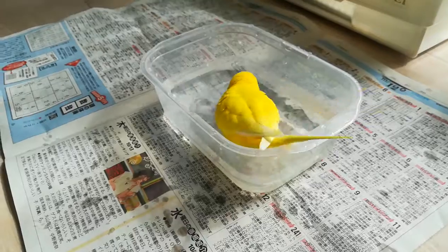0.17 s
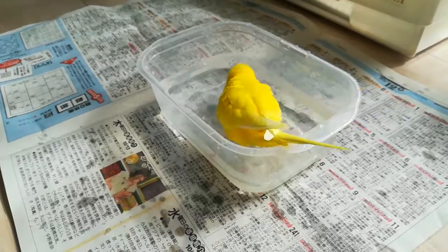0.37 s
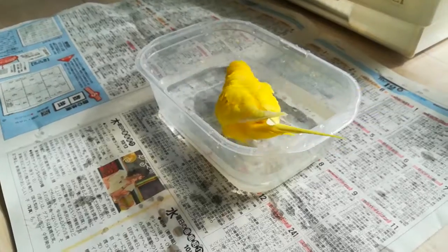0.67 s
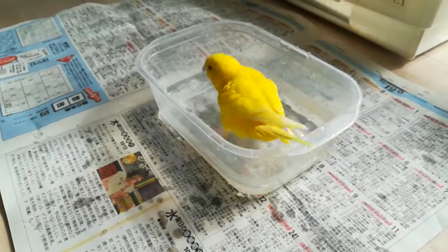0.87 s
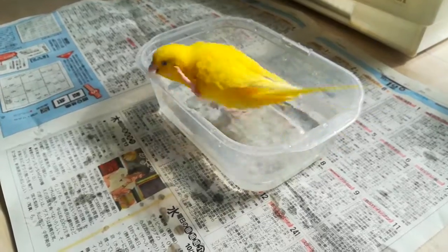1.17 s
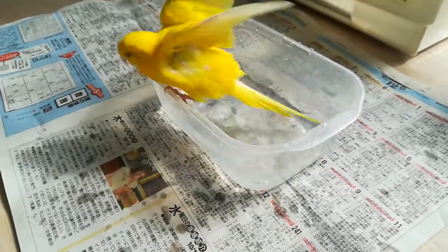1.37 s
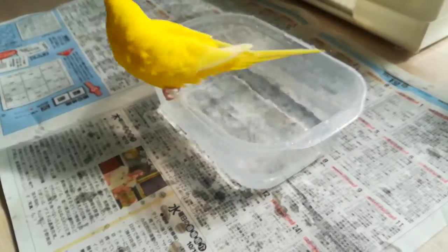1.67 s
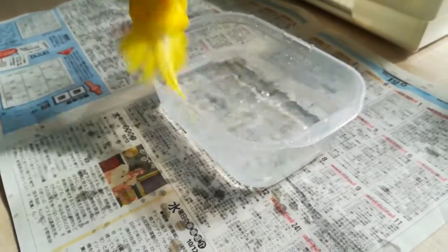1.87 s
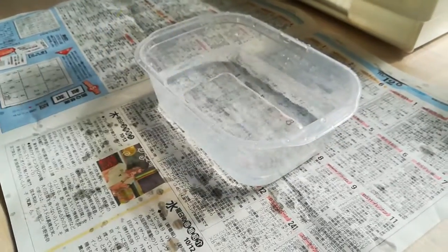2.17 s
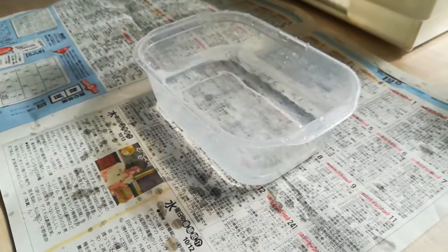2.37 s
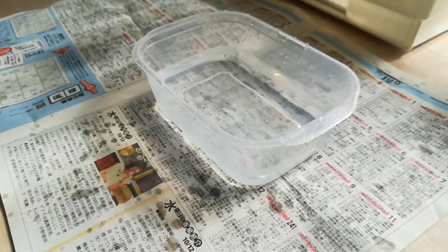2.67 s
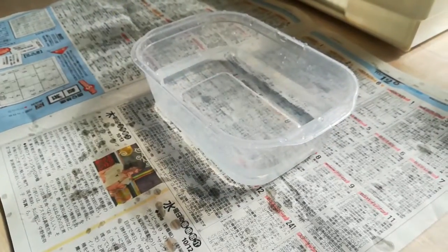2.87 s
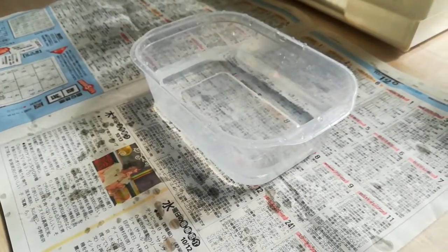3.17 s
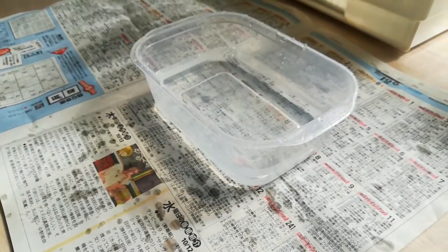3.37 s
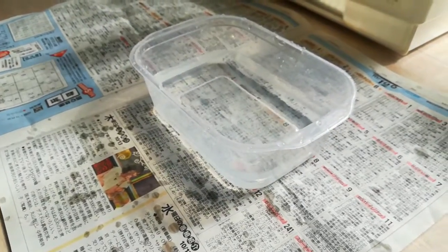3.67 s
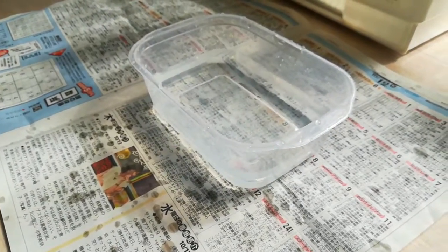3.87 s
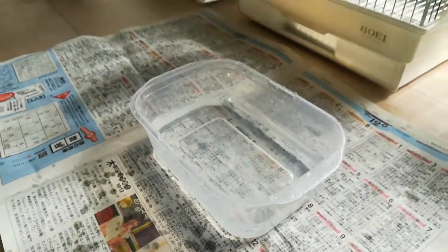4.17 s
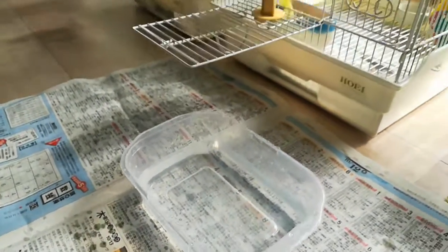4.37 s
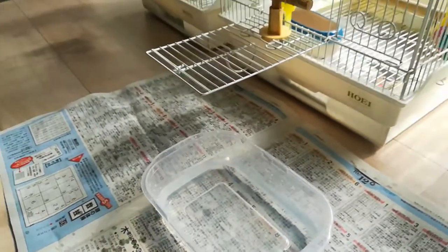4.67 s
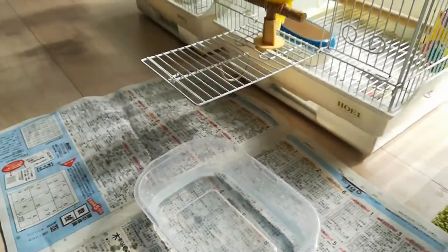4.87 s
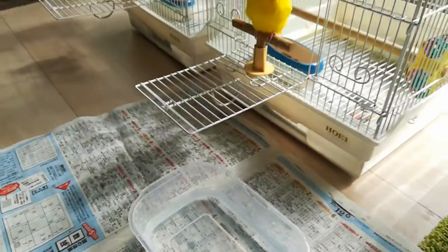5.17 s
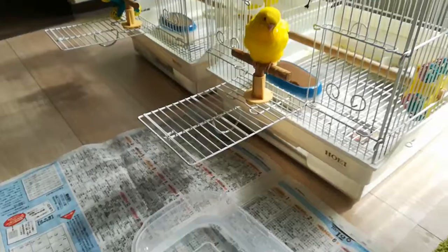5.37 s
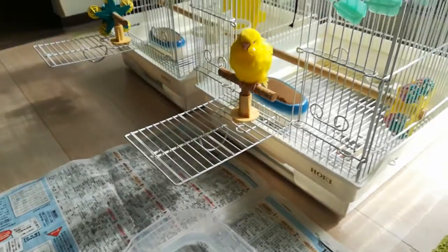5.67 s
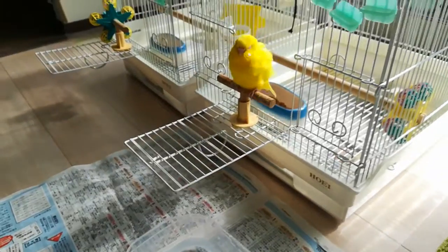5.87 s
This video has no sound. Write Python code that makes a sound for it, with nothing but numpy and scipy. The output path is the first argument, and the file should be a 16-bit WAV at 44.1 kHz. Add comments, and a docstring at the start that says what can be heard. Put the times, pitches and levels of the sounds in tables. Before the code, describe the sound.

A small bird leaves its plastic bath with knocks, drips and wing puffs, shakes its feathers in a cage, chirps, scratches and settles.

```python
"""A pop as the microphone opens, then wet claws and drops ticking on a shallow plastic tub in a small room.
A budgie leaves its bath there: wing beats push air on the microphone as it takes off for its wire cage.
It shakes its feathers until the wires ring, chirps once, scratches itself and shuffles on the perch.
Filtered noise makes feathers, knocks and air; gliding harmonics make the voice; dying sines ring tub and metal.
Echoes and a decaying tail place the bird in the room, over quiet air and a wavering hum."""
import sys
import numpy as np
from scipy import signal
from scipy.fft import rfft, irfft, next_fast_len
from scipy.io import wavfile

SR = 44100
rng = np.random.default_rng(int(sys.argv[2]) if len(sys.argv) > 2 else 0)


def store_wav(level_fs):
    """Save 16-bit WAV to argv[1]."""
    pcm = np.round(np.clip(np.atleast_2d(level_fs), -1, 1) * 32767)
    wavfile.write(sys.argv[1], SR, pcm.T.astype(np.int16))


N = 264952
TIME = np.arange(N) / SR
POP_S, LANDING_S = 0.2535, 2.06  # the microphone opens; the bird lands on the cage
EDGE_HZ = 16100  # upper limit of the microphone's band


def amp(db):
    """Turns decibels into gain."""
    return 10 ** (np.asarray(db) / 20)


def unit(x):
    """Scales to rms 1."""
    return x / np.sqrt(np.mean(x ** 2) + 1e-20)


def read(points, hz):
    """Reads a table on a log-frequency axis."""
    f, value = np.transpose(points)
    return np.interp(np.log(hz + 1), np.log(f + 1), value)


def colour(x, points):
    """Filters x with the spectrum of a table, then scales to rms 1."""
    size = next_fast_len(x.shape[-1])
    gain = amp(read(points, np.fft.rfftfreq(size, 1 / SR)))
    return unit(irfft(rfft(x, size) * gain, size)[..., :x.shape[-1]])


def band(x, lo_hz, hi_hz):
    """Passes one band."""
    sos = signal.butter(2, [lo_hz, min(hi_hz, SR / 2 - 1)], "band", fs=SR, output="sos")
    return signal.sosfilt(sos, x)


def resonance(x, hz, width_hz):
    """Passes x through one resonance of peak gain 1."""
    return signal.lfilter(*signal.iirpeak(hz, hz / width_hz, SR), x)


def wander(size, hz):
    """Draws a random drift of rms 1, smooth above hz."""
    lowpass = 1 + (np.fft.rfftfreq(size, 1 / SR) / hz) ** 4
    return unit(irfft(rfft(rng.standard_normal(size)) / lowpass, size))


def add(mix, start_s, sound):
    """Mixes a sound in at its start time."""
    part = mix[..., max(round(start_s * SR), 0):][..., :sound.shape[-1]]
    part += sound[..., :part.shape[-1]]


def sides(left_db):
    """Gains of the two channels, the left louder than the right by left_db."""
    return amp([[left_db / 2], [-left_db / 2]])


def ring(modes, t):
    """Sums the dying sines of a struck body."""
    return sum(amp(db - 60 * t / t60_s) * np.sin(2 * np.pi * hz * t) for hz, db, t60_s in modes)


# The air that the feathers stir: pitch_hz [Hz], relative level_db [dB]
STIRRED_AIR = [(120, -9), (300, -4.5), (480, 1), (680, -5), (1100, 0.5), (1400, 0), (1680, 1), (1950, -4.5),
               (2400, -4.5), (3500, -11.5), (7000, -23.5)]
# The shake builds up, holds and dies away
SHAKE_START_S, SHAKE_RISE_S, SHAKE_EASE_S, SHAKE_END_S = 2.657, 0.12, 2.985, 3.332


def shake(air_db=-54, hiss_db=-43, throb_db=-56, beat_hz=27, depth=0.51,
          peak_s=2.888, hiss_width_s=0.14, throb_width_s=0.33):
    """The shaking body fans the air; its hardest part makes the feathers hiss and the cage throb."""
    times_s = [SHAKE_START_S, SHAKE_START_S + SHAKE_RISE_S, SHAKE_EASE_S, SHAKE_END_S]
    level = np.interp(TIME, times_s, [0, 1, 1, 0])
    uneven_hz = beat_hz * (1 + 0.11 * wander(N, 9.1))
    beat = 1 + depth * np.sin(2 * np.pi * np.cumsum(uneven_hz) / SR)
    fanned = level * amp(air_db) * beat * colour(rng.standard_normal((2, N)), STIRRED_AIR)

    hiss_swell = level * np.exp(-((TIME - peak_s) / hiss_width_s) ** 2)
    hiss = hiss_swell * amp(hiss_db) * beat * band(barbs(), 500, 14000)

    throb_swell = level * np.exp(-((TIME - peak_s) / throb_width_s) ** 2)
    throb = throb_swell * amp(throb_db) * unit(band(rng.standard_normal(N), 49.5, 78))
    return fanned, hiss, throb


# The feathers' hiss: pitch_hz [Hz], relative level_db [dB]
FEATHER_HISS = [(900, -29), (2700, -6.5), (3700, -3.5), (4400, -0.5), (6000, -4), (7900, -2.5), (9000, -7),
                (11300, -10), (13500, -15), (16000, -29)]


def barbs(grain_db=2.5, spread=1.0):
    """Feathers sliding over each other give a grainy hiss, partly alike on both sides."""
    grains = amp(grain_db * np.minimum(wander(N, 380), 2))
    shared = rng.standard_normal(N)
    return colour((shared + spread * rng.standard_normal((2, N))) * grains, FEATHER_HISS)


def flick(strokes, air_db, top_hz, rise_s=0.0026, fall_s=0.016):
    """Feather strokes (start_s, level_db, length_s) hiss and puff air: they start fast, sag and die."""
    lowpass = signal.butter(3, min(top_hz, EDGE_HZ), fs=SR, output="sos")
    hiss = signal.sosfilt(lowpass, barbs())
    level, t = np.zeros(N), TIME[:SR // 2]
    for start_s, db, length_s in strokes:
        fade = np.exp(-.5 * t / length_s - np.maximum(t - length_s, 0) / fall_s * 2)
        add(level, start_s, amp(db) * np.minimum(t / rise_s, 1) * fade)
    return level * (hiss + amp(air_db) * colour(rng.standard_normal((2, N)), STIRRED_AIR))


# Wing beats flick the wet feathers: start_s [s], relative level_db [dB]
WING_FLICKS = [(1.264, -58.5), (1.325, -56.5), (1.433, -61), (1.887, -45), (1.945, -50), (2.008, -57.5)]
# The sharpest jerks of the shake: start_s [s], relative level_db [dB]
SHAKE_JERKS = [(2.655, -57.5), (2.683, -47), (2.713, -41), (2.78, -36.5), (2.885, -35.5), (2.952, -41),
               (3.082, -38)]
# The bird settles and shifts on the cage:
# start_s [s], relative level_db [dB], length_s [s], top_hz of the hiss [Hz]
PERCH_SHUFFLES = [(2.085, -50.5, 0.053, 8650), (3.59, -64.5, 0.15, 7900), (5.136, -59, 0.058, 9000),
                  (5.202, -51.5, 0.075, 7160), (5.327, -52.5, 0.057, 6600), (5.461, -59, 0.054, 4560),
                  (5.602, -58, .09, 4530)]


def rustles(beat_s=0.041, jerk_s=0.03, scratch_db=-61, hollow_db=-3):
    """Wing beats and jerks are short and bright, shuffles soft and hollow; scratching leaves a faint hiss."""
    wings = flick([(s, db, beat_s) for s, db in WING_FLICKS], air_db=-1.5, top_hz=13700)
    jerks = flick([(s, db, jerk_s) for s, db in SHAKE_JERKS], air_db=-13.5, top_hz=15300)
    shuffles = sum(flick([(s, db, length_s)], air_db=-2.5, top_hz=top_hz, rise_s=0.0058)
                   for s, db, length_s, top_hz in PERCH_SHUFFLES)
    hollow = amp(hollow_db) * resonance(shuffles, 1700, 350)
    start_s, end_s = SCRATCH_BOUTS[0][0], SCRATCH_BOUTS[-1][1]
    raking = flick([(start_s, scratch_db, end_s - start_s)], air_db=-6, top_hz=11900, rise_s=0.043)
    return wings + jerks + shuffles + hollow + raking


# Resonances of the cage wires: pitch_hz [Hz], width_hz [Hz], relative level_db [dB]
CAGE_WIRES = [(1680, 40, -13), (3750, 60, -16), (4960, 120, -19), (6090, 30, -13), (7940, 90, -18),
              (11100, 200, -24), (12800, 25, -23), (14600, 100, -19), (15500, 100, -21)]


def wires(feathers, level_db=-60.5):
    """While the bird shakes, its feather noise drives the narrow resonances of the cage wires."""
    shaking = (TIME > SHAKE_START_S) & (TIME < SHAKE_END_S)
    driven = feathers * shaking
    ringing = sum(amp(db) * unit(resonance(driven, hz, width_hz)) for hz, width_hz, db in CAGE_WIRES)
    return amp(level_db) * ringing


# Syllables of the chirp: start_s [s], length_s [s], relative level_db [dB],
# first_hz [Hz], last_hz [Hz], rough [0-1], beak opening [0-1]
CHIRP_SYLLABLES = [(3.648, 0.041, -59, 1517, 2033, 0.4, .05), (3.69, 0.021, -43.5, 1639, 1707, 0.1, 0.3),
                   (3.712, 0.01, -42.5, 1827, 1885, 0.25, 0.57),
                   (3.725, 0.013, -38, 1830, 1700, 0.14, 0.76),
                   (3.741, 0.0172, -41, 1998, 2080, 0.21, 0.57), (3.754, .04, -40, 1329, 1046, 0.6, 0.62),
                   (3.795, .042, -38, 1057, 923, 0.18, 0), (3.841, 0.0064, -31.5, 901, 860, 0.07, 0.4),
                   (3.846, .018, -29, 831, 660, .5, 0.86)]


def chirp(level_db=-3):
    """The voice warbles upward, drops to a low buzz and ends in a harsh bark."""
    out = np.zeros(N)
    for start_s, length_s, db, *shape in CHIRP_SYLLABLES:
        add(out, start_s, amp(db + level_db) * syllable(length_s, *shape))
    return out


# The bird's throat: pitch_hz [Hz], relative shut_db with the beak nearly shut [dB], open_db [dB]
THROAT_COLOUR = [(720, -44, -58), (1030, -38, -4), (1330, 3, -10.5), (1540, 2.5, -8.5), (1960, -9, -24),
                 (2800, 21, -7), (3330, -12.5, -7), (3610, -8, 3.5), (4350, -29, -11.5), (5070, -41, 1.5),
                 (5770, -53, -7), (6700, -27.5, -26), (8400, -28, -11), (8740, -17, -31), (9700, -55, -55)]


def syllable(length_s, first_hz, last_hz, rough, beak, jitter=0.089, shimmer=0.4, rasp=0.83,
             rise_s=0.0037, fall_s=0.0057, sag_db=-1.5):
    """One glide of the syrinx; the throat picks out its harmonics."""
    t = np.arange(0, length_s + fall_s, 1 / SR)
    hz = np.interp(t, [0, length_s], [first_hz, last_hz])
    unsteady = 1 + jitter * rough * wander(SR // 4, 620)[:len(t)]
    turns = np.cumsum(hz * unsteady) / SR
    k = np.arange(1, 15)[:, None]  # harmonic numbers
    shut_db, open_db = (read([(row[0], row[side]) for row in THROAT_COLOUR], k * hz) for side in (1, 2))
    # the beak's opening moves the throat from its shut colour to its open one
    weights = amp(shut_db + beak ** 2 * (open_db - shut_db)) * (k * hz < EDGE_HZ)
    # in the harsh parts the harmonics slip out of step and smear into a rasp
    drift = np.array([wander(SR // 4, 335)[:len(t)] for _ in k])
    slip = rng.random(k.shape) + rasp * rough * drift / 2
    harmonics = weights * np.cos(2 * np.pi * (k * turns + slip))
    voice = harmonics.sum(0) / np.sqrt((weights ** 2).sum(0) / 2)
    envelope = np.minimum(t / rise_s, 1) * np.minimum((t[-1] - t) / fall_s, 1)
    flutter = 1 + shimmer * rough * wander(SR // 4, 300)[:len(t)]
    return envelope * amp(sag_db * t / length_s) * voice * flutter


# Thin, faint peeps: start_s [s], length_s [s], relative level_db [dB], pitch_hz [Hz]
FAINT_PEEPS = [(4.272, .08, -69, 4380), (4.385, 0.049, -61.5, 4350), (4.415, 0.062, -65, 4810),
               (4.591, .055, -68, 4400), (4.627, .042, -59.5, 4390), (5.615, .08, -70, 2230)]


def peeps(waver=0.0091):
    """Faint whistles swell and fade, each wavering about one pitch."""
    out = np.zeros(N)
    for start_s, length_s, db, hz in FAINT_PEEPS:
        t = np.arange(0, length_s, 1 / SR)
        turns = np.cumsum(hz * (1 + waver * wander(SR // 4, 250)[:len(t)])) / SR
        add(out, start_s, amp(db) * np.sin(np.pi * t / length_s) * np.sin(2 * np.pi * turns))
    return out


# Claws knock on the tub, later on the perch:
# start_s [s], relative level_db [dB], relative dull_db of the lower band [dB], left_db over right [dB]
CLAW_TAPS = [(1.189, -55.5, 3, 13.5), (1.1966, -49, -4, 0), (1.2366, -58.5, 0, -9), (1.2608, -45, -30, -1),
             (1.314, -47, -8, 5), (1.3332, -32.5, -8, 4.5), (1.514, -53, -21, -2), (1.527, -47, -9.5, 11),
             (1.8755, -43, -16, 7), (1.8994, -32.5, -5.5, 11), (1.9023, -37, -23, -14),
             (1.919, -41, -33, 1), (2.012, -45.5, -6.5, 8), (5.1848, -52, -28, -5), (5.207, -44, -28, 0),
             (5.2655, -52, -23, -8)]


def taps(level_db=2.5, dull_trim_db=-1):
    """Claws knock on plastic and wood, each a short crack from its own side."""
    out = np.zeros((2, N))
    for start_s, db, dull_db, left_db in CLAW_TAPS:
        knock = tap(db + level_db, dull_db + dull_trim_db, bright_db=-42, t60_s=.014, bright_hz=13300)
        add(out, start_s, sides(left_db) * knock)
    return out


# The ring of the tub: pitch_hz [Hz], relative level_db [dB], t60_s [s]
TUB_RING = [(732, 11, 0.029), (1197, 7, 0.015), (1440, -14, 0.13), (2470, 9, 0.011)]


def tap(db, dull_db, bright_db, t60_s, bright_hz, likeness=0.45, rise_s=0.0003,
        tub_db=-3, snap=0.65, snap_s=0.00054):
    """A tiny crack in three bands, sharpest at first; the duller it is, the more it rings the tub."""
    t = np.arange(SR // 12) / SR
    grit = rng.standard_normal((3, len(t)))
    # some of the grit is alike on both sides
    crack = (likeness * grit[2] + (1 - likeness) * grit[:2]) * amp(-60 * t / t60_s)
    crack = crack * np.minimum(t / rise_s, 1) * (1 + snap * np.exp(-t / snap_s))
    middle, dull, bright = band(crack, 2600, 6660), band(crack, 1080, 2530), band(crack, 6000, bright_hz)
    parts = (middle, dull, bright, ring(TUB_RING, t))
    gains = amp([0, dull_db, bright_db, 2 * dull_db + tub_db])
    return 2 * amp(db) * sum(gain * part / np.abs(part).max() for gain, part in zip(gains, parts))


# Drops fall off the wet bird: start_s [s], relative level_db [dB]
FALLING_DROPS = [(.979, -57.5), (1.05, -61), (1.4133, -42), (1.4368, -43), (1.4514, -46), (1.618, -51.5),
                 (1.8115, -56), (1.8378, -41.5), (1.9734, -43)]
# Fine spray falls at random while it climbs out
SPRAY_START_S, SPRAY_END_S, SPRAY_PER_S, SPRAY_DB = 1.22, 1.75, 12, -56.5


def drips(level_db=-11, left_db=3):
    """Drops and fine spray land with small, bright ticks."""
    out = np.zeros((2, N))
    count = round(SPRAY_PER_S * (SPRAY_END_S - SPRAY_START_S))
    spray = [(s, SPRAY_DB) for s in rng.uniform(SPRAY_START_S, SPRAY_END_S, count)]
    for start_s, db in FALLING_DROPS + spray:
        tick = tap(db + level_db, dull_db=-19, bright_db=11, t60_s=0.0068, bright_hz=8360)
        add(out, start_s, sides(left_db) * tick)
    return out


# Bouts of scratching: start_s [s], end_s [s], relative first_db and last_db of their ticks [dB]
SCRATCH_BOUTS = [(4.0715, 4.107, -53, -54), (4.207, 4.48, -51.5, -46), (4.542, 4.645, -48, -51.5)]


def scratches(level_db=1.5, left_db=2, fizz_db=-13, stroke_s=.0414, t60_s=.027):
    """The foot rakes the feathers in quick, even strokes, each a dry tick with a fizzy top."""
    out = np.zeros((2, N))
    for start_s, end_s, first_db, last_db in SCRATCH_BOUTS:
        times = np.arange(start_s, end_s, stroke_s)
        for s, db in zip(times, np.linspace(first_db, last_db, len(times))):
            tick = tap(db + level_db, dull_db=-10, bright_db=-4, t60_s=t60_s, bright_hz=9160)
            fizz = amp(db + fizz_db) * band(rng.standard_normal(tick.shape), 10000, 16000)
            fizz = fizz * amp(-60 * TIME[:tick.shape[1]] / t60_s)
            add(out, s, sides(left_db) * (tick + fizz))
    return out


# Wing beats that push air on the microphone: peak time start_s [s], level_db [dB], pitch_hz [Hz]
WING_GUSTS = [(1.324, -46, 60), (1.369, -48.5, 53.6), (1.895, -31, 54), (1.93, -39, 50),
              (1.958, -32.5, 44.5), (2.015, -41.5, 57.4)]


def gusts(cycles=0.5, eddy_db=-19):
    """A wing beat is one swing of pressure with a few eddies behind it."""
    out = np.zeros(N)
    eddies = amp(eddy_db) * unit(band(rng.standard_normal(N), 23, 127))
    for peak_s, db, hz in WING_GUSTS:
        turns = (TIME - peak_s) * hz
        out += amp(db) * np.exp(-(turns / cycles) ** 2) * np.cos(2 * np.pi * turns)
        out += amp(db) * np.exp(-(turns - 1) ** 2 / 2) * eddies  # centred one cycle later
    return out


# The hollow cage tray below the bird: pitch_hz [Hz], width_hz [Hz], relative level_db [dB]
CAGE_TRAY = [(1114, 210, -4), (1573, 52, -5), (2110, 330, -5), (3500, 1000, -8.5), (6100, 1400, -5.5)]


def tray(x, direct_db=-3):
    """Once the bird has landed, its rustles ring in the tray."""
    ringing = sum(amp(db) * resonance(x, hz, width_hz) for hz, width_hz, db in CAGE_TRAY)
    return np.where(TIME > LANDING_S, amp(direct_db) * x + ringing, x)


# Early reflections from floor, tray and wall: left_s delay [s], right_s delay [s], level_db [dB]
EARLY_ECHOES = [(.0011, 0.001282, -16.5), (.0027, .0023, -19), (.0049, .0054, -15), (.0083, .0077, -17),
                (0.0121, .0133, -10)]


def reflect(x):
    """The direct sound meets its first echoes, which comb the spectrum."""
    both = x * np.ones((2, 1))
    out = both.copy()
    for *delays_s, db in EARLY_ECHOES:
        for channel, delay_s in enumerate(delays_s):
            add(out[channel], delay_s, amp(db) * both[channel])
    return out


def spaced(x, count=7):
    """Sound reaches the right microphone a few samples after the left."""
    return np.array([x[0], np.pad(x[1], (count, 0))[:N]])


# Room decay: pitch_hz [Hz], t60_s [s]
ROOM_DECAY = [(200, 0.81), (1500, 0.35), (5000, 0.37), (9000, 0.33), (15000, 0.099)]


def room(x):
    """Sparse random reflections of a small room die away, the bass lingering longest."""
    reflections = rng.standard_normal((2, SR // 2)) * (rng.random((2, SR // 2)) < .15)
    reflections[:, :round(.004 * SR)] = 0
    hz, t, bins = signal.stft(reflections, SR, nperseg=256)
    decay = amp(-60 * t / read(ROOM_DECAY, hz)[:, None])
    tail = signal.istft(bins * decay, SR, nperseg=256)[1]
    return signal.oaconvolve(np.atleast_2d(x), tail / np.linalg.norm(tail[0]), axes=1)[:, :N]


# Faint metal ring at the pop: pitch_hz [Hz], relative level_db [dB], t60_s [s]
METAL_RING = [(644, -70, 0.33), (2580, -69, 0.81), (4300, -67, 0.3), (4370, -65, .28), (6430, -63, 0.29),
              (6630, -69, 0.19), (8900, -67, 0.23)]


def ping(level_db=-3, clatter_db=-64, fade_s=0.051):
    """A faint metallic clink dies away in the room just as the microphone opens."""
    t, out = TIME[:SR], np.zeros(N)
    clatter = amp(clatter_db) * np.exp(-t / fade_s) * unit(band(rng.standard_normal(SR), 640, 6200))
    metal = amp(level_db) * ring(METAL_RING, t) * (1 + 0.43 * wander(SR, 80))
    add(out, POP_S, metal + clatter)
    return out + amp(0.5) * room(out)


# Spectrum of the room air: pitch_hz [Hz], relative level_db per Hz [dB]
ROOM_AIR = [(15, -46), (25, -8), (70, -8.5), (102, -6.5), (123, -10.5), (200, -3.5), (249, -13.5),
            (317, -17.5), (863, -20), (1070, -17), (1190, -20.5), (1440, -21.5), (2050, -23.5),
            (8830, -30.5), (16000, -40)]
# Left-right likeness of the air: pitch_hz [Hz], likeness [0-1]
AIR_LIKENESS = [(100, 0.97), (200, 0.92), (400, 0.057), (1000, 0.14), (3000, 0.015)]
# Mains hum: pitch_hz [Hz], level_db before the swell [dB]
MAINS_HUM = [(100, -75.5), (200, -72), (484, -86), (1066, -98.5)]
# The hum swells and sinks: time_s [s], gain_db [dB]
HUM_GAIN = [(.3, 3.5), (1.0, -4.5), (1.8, -3), (2.4, -1), (3.0, 8), (3.5, -4), (3.85, 7.5), (4.35, -2),
            (6, -8)]


def air(air_db=-65):
    """Quiet room air, alike on both sides in the bass, with a wavering hum of narrow noise bands."""
    size = next_fast_len(N)
    left, other = rfft(rng.standard_normal((2, size)))
    same = np.clip(read(AIR_LIKENESS, np.fft.rfftfreq(size, 1 / SR)), 0, 1)
    right = same * left + np.sqrt(1 - same ** 2) * other
    noise = colour(irfft(np.array([left, right]), size)[:, :N], ROOM_AIR)
    hum = sum(amp(db) * unit(band(rng.standard_normal(N), hz - 9, hz + 9)) for hz, db in MAINS_HUM)
    return amp(air_db) * noise + hum * amp(np.interp(TIME, *np.transpose(HUM_GAIN)))


def scene():
    """Taps are near and dry; the feathers and the voice carry more of the room."""
    near = taps() + drips() + scratches()
    fanned, hiss, throb = shake()
    feathers = rustles() + hiss
    far = reflect(tray(amp(-6) * feathers + fanned)) + wires(feathers)
    body = near + amp(-11) * room(near) + sides(0.6) * (far + amp(-3.5) * room(far))

    voice = band(band(chirp(), 1140, 8800), 1140, 8800)  # twice, for steeper edges
    whistle = peeps()
    call = reflect(voice) + amp(-3) * room(voice) + whistle + amp(-7) * room(whistle)
    return spaced(body) + call + ping() + gusts() + throb + air()


def record(dry, pop_db=-26.0, settle_s=0.17, edge_s=.00004, rebound=0.43, rebound_s=0.00048):
    """The microphone opens with a step of offset that rebounds once and settles; then the band limit."""
    since = np.maximum(TIME - POP_S, 0)
    dip = rebound * np.exp(-(2 * (since / rebound_s - 1)) ** 2 / 2)
    step = (1 - np.exp(-since / edge_s)) * (1 - dip)
    pop = amp(pop_db) * step * np.exp(-(since / settle_s) ** 2)
    live = (TIME >= POP_S) * dry - pop
    lowpass = signal.firwin(511, EDGE_HZ, window=("kaiser", 9), fs=SR)
    return signal.oaconvolve(live, lowpass[None], "same")


dry = scene()
out = record(dry)
store_wav(out)
```